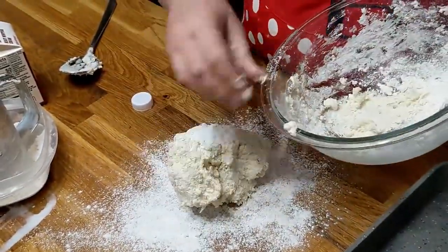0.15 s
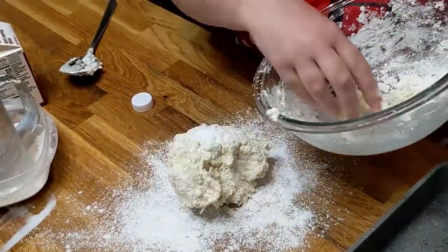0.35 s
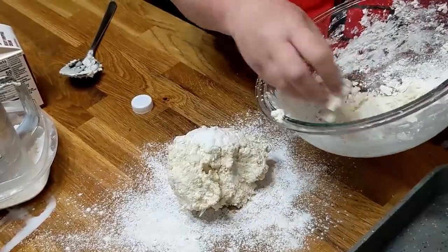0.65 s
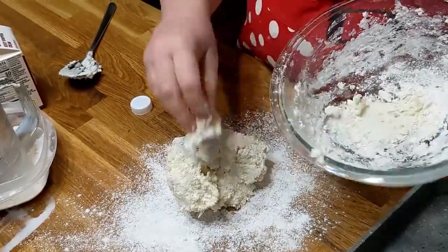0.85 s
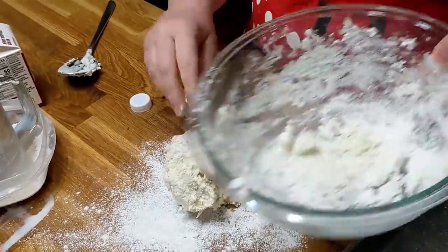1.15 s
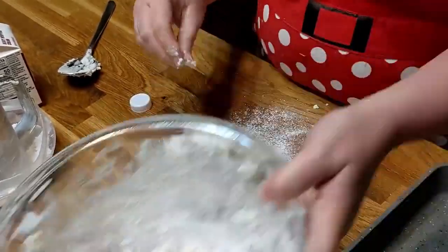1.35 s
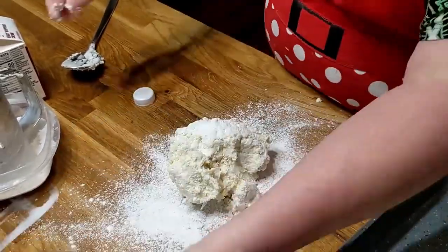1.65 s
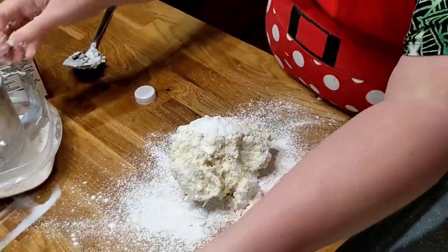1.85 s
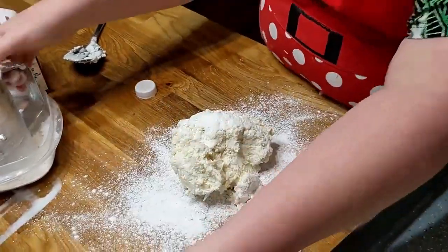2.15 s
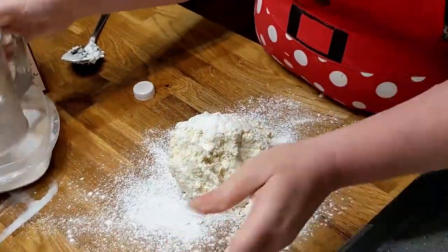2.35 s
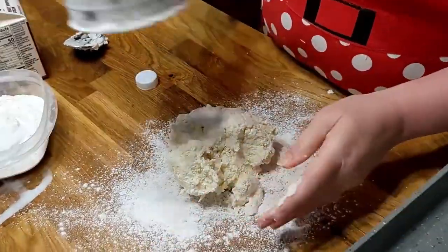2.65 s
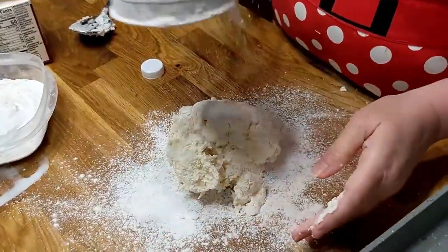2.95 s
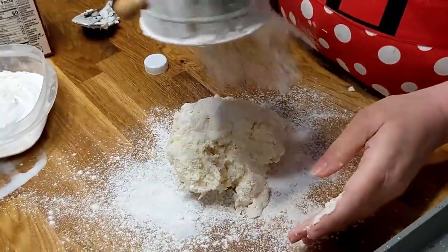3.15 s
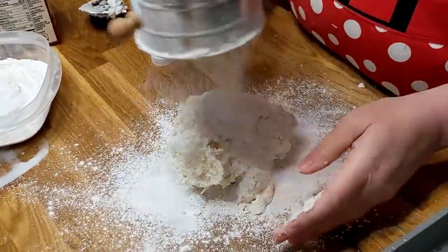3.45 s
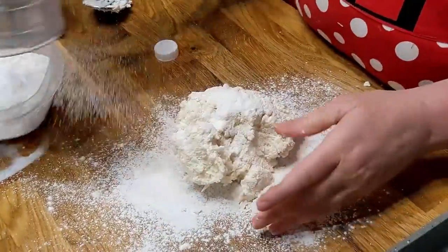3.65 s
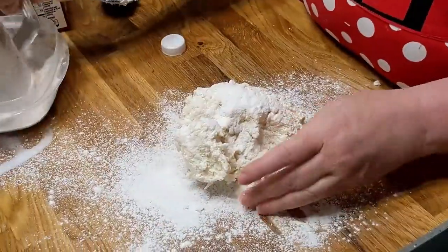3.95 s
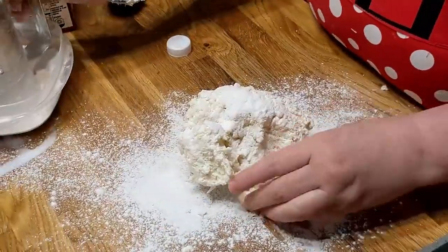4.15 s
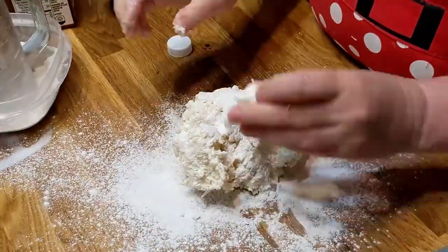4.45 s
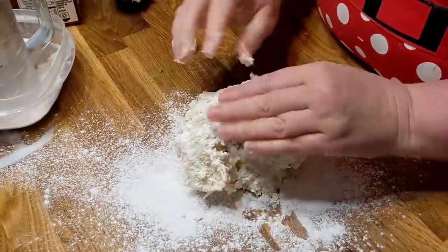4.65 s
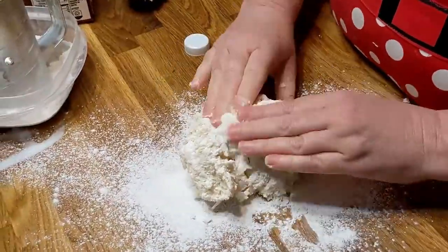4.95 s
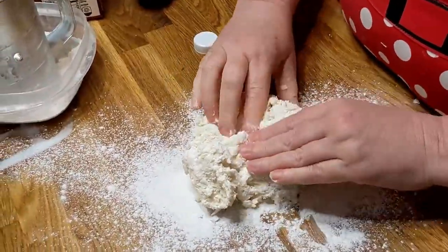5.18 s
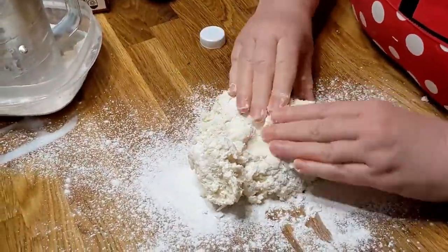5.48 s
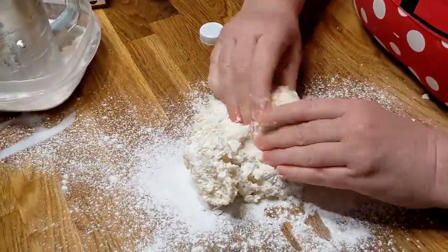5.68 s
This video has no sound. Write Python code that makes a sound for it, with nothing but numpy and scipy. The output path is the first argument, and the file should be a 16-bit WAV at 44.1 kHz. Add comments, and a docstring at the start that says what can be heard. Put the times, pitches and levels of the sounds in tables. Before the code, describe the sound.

A small, lively kitchen heard up close in stereo. From 0 to 1.8 s there is almost nothing: faint low rumble, a weak steady appliance hum, thin hiss and slight sleeve rustle, slowly growing. At about 1.88, 2.03 and 2.13 s a heavy glass bowl hits the wooden worktop: three huge, woody, booming knocks with a glassy click at the edge, squeezed and clipped, their low ring fading over half a second. From 2.75 to 4.0 s a metal sieve is shaken in some sixteen uneven jolts, strongest near 2.85, each a short bright rattle with gritty mesh, hissing powder and slight tinny ring. At 4.18-4.24 s it clatters into a hollow plastic tub, a quick cluster of cracks and clacks with a low thud. A soft dry hand sweep over flour fades from 4.4 s; near 5.6-5.8 s come very faint dull pats and a duller rub on dough.

```python
"""Three booming knocks as a heavy glass bowl is put down to one side on a wooden kitchen counter; then a metal
sieve is shaken, clatters into its plastic flour tub, and hands pat and rub dough over a faint appliance hum.
Solid bodies are sums of damped modes; scrapes, powder, cracks and rustle are shaped noise broken into grains.
A small live room adds a ceiling echo and a diffuse tail; gain control and clipping squeeze the knocks."""
import sys
import numpy as np
from scipy import signal
from scipy.fft import rfft, irfft, next_fast_len
from scipy.io import wavfile
from scipy.ndimage import map_coordinates

SR = 44100
rng = np.random.default_rng(int(sys.argv[2]) if len(sys.argv) > 2 else 0)


def put_to_file(sound):
    """Save the sound as 16-bit audio at rate SR, in the file named by the first command-line argument."""
    columns = np.atleast_2d(sound).T  # one column per channel
    safe = np.clip(columns, -1, 1)
    whole_steps = np.round(safe * 32767)
    wavfile.write(sys.argv[1], SR, whole_steps.astype(np.int16))


N = 256662  # length in samples

# Relative spectrum of skin, flour and cloth rubbing: frequency_hz, density_db (per Hz)
RUSTLE = [(300, -14.5), (900, 0.5), (1600, -0.5), (2800, -2.5), (4500, -11), (7000, -19.5), (15000, -21.5)]


def bowl():
    """Impact excitation: each contact clicks the glass, rings bowl and worktop, and drives the room's boom."""
    # Bowl touching and meeting the worktop: start_s, knock_db, boom_db, click_db
    knocks = [(1.873, -37.5, -48, -68), (1.8818, 1, -5.5, -11), (2.0342, 1, -12, -17),
              (2.1304, 1.5, -6.5, -15.5)]
    # Short modes of bowl and worktop together: frequency_hz, level_db, t60_s
    contact_modes = [(382, -4, 0.057), (463, 10, 0.015), (584, -1.5, 0.018), (749, -12.5, 0.059),
                     (927, -1, 0.034), (1335, -8.5, 0.039), (1753, -17, 0.048), (2518, -29, 0.027),
                     (3900, -22, 0.0071)]
    # Long modes of the worktop: frequency_hz, level_db, t60_s
    worktop_modes = [(109, -3, 0.65), (140.3, -3.5, .52), (179.2, 4, 0.55), (247.34, -4, 0.94),
                     (341, -1.5, 0.44), (384.7, 2, 0.54), (418, -1.5, 0.31), (556, -3, 0.4),
                     (634, -9.5, .4), (694, -8.5, 0.37), (763, -4.5, 0.39), (787, -14.5, 0.67),
                     (880, -14, 0.44), (1001, -8, 0.33), (1303, -9, 0.15), (1420, -12, 0.14),
                     (1715, -18.5, 0.46)]
    # Relative spectrum of the room's boom: frequency_hz, density_db (per Hz)
    boom_spectrum = [(35, -45), (70, -21), (100, -16), (175, -3.5), (280, -9.5), (350, -6.5), (470, -11.5),
                     (630, -6), (900, -15), (1110, -18.5), (1340, -19.5), (1600, -22), (2200, -26.5),
                     (3100, -34.5), (3700, -42.5), (5000, -53.5), (8000, -57.5), (14000, -79.5)]
    # Relative spectrum of the glass click: frequency_hz, density_db (per Hz)
    rim_spectrum = [(30, -6.5), (150, -5), (700, 9), (2000, 5), (4000, -4.5), (6000, -16), (10000, -22),
                    (16000, -32)]
    worktop_db = -17.5  # relative to the knock

    out = np.zeros((2, N))
    for start_s, knock_db, boom_db, click_db in knocks:
        knock = amp(knock_db) * swell(contact_modes, rise_s=0.0016, scatter_db=1)
        worktop = amp(knock_db + worktop_db) * swell(worktop_modes, rise_s=0.006, scatter_db=1.5)
        click = amp(click_db) * burst(colour(rim_spectrum), t60=0.03, attack_s=0.00054)
        boom = amp(boom_db) * tail(colour(boom_spectrum), attack_s=0.0074)
        add(out, start_s, room(knock, wet_db=-23, ceiling_db=-7.5))
        add(out, start_s, click)
        add(out, start_s, worktop)
        add(out, start_s, boom)
    return out


def sieve():
    """Friction and resonance: each shake rattles and rings the metal drum and throws powder on its mesh."""
    # Jolts of the sieve against the hand: jolt_s, strength_db, powder_db, slide_before_s, jolt_t60_s
    shakes = [(2.748, -41.5, -12, 0.00018, .028), (2.801, -20, -8.5, .004, .028),
              (2.853, -14.5, -9, .007, 0.029), (2.952, -18, -15, .009, 0.031),
              (3.103, -26.5, -27, .028, .025), (3.186, -23, -26, .011, .04),
              (3.261, -18, -11.5, 0.0017, .038), (3.387, -25.5, -19.5, .004, 0.042),
              (3.478, -25.5, -32.5, .006, 0.053), (3.57, -25.5, -14, .004, 0.024),
              (3.634, -23.5, -21.5, 0.00096, 0.034), (3.673, -32, -15, .012, .05),
              (3.828, -24.5, -14.5, 0.0013, .028), (3.872, -40.5, -24, 0.0019, 0.066),
              (3.922, -33, -19, 0, .045), (4.001, -37.5, -24, 0.0042, 0.019)]
    # Broad resonances of the drum's body: frequency_hz, width_hz, level_db
    body_peaks = [(890, 170, 1), (1300, 280, -12), (1890, 410, -1.5), (3063, 210, 4), (3670, 180, -2),
                  (4470, 310, -1), (4840, 210, -1.5), (5820, 120, -11.5)]
    # Relative spectrum of the wire mesh scraping: frequency_hz, density_db (per Hz)
    mesh_spectrum = [(450, -26), (800, -5), (1500, -1), (2100, -2), (3050, -9), (3800, -7), (4700, -9.5),
                     (6200, -13.5), (7800, -16.5), (9100, -18), (15000, -19)]
    # Relative spectrum of powder on the mesh: frequency_hz, density_db (per Hz)
    powder_spectrum = [(4000, -36.5), (6500, 5), (8000, -3.5), (9000, 6.5), (12000, -2), (15500, -8)]
    # Lasting ring of the drum: frequency_hz, level_db, t60_s
    drum_modes = [(929, -6, 0.12), (1910, -4, 0.21), (2027, -4, 0.167), (2140, 6.5, 0.11),
                  (2900, -10, 0.04), (3160, -21, 0.15), (3760, -10, 0.18), (4360, -3.5, 0.14),
                  (4680, -17, 0.19), (4900, -7, 0.18)]
    usual_shake_db, usual_ring_db = -24, -51
    ring_growth = 0.66  # dB of ring per dB of strength

    out, n = np.zeros((2, N)), SR // 2
    for jolt_s, strength_db, powder_db, slide_s, t60 in shakes:
        body = amp(-5) * noise(resonances(body_peaks, scatter_db=3.5), n)
        mesh = amp(-8.5) * noise(colour(mesh_spectrum), n)
        powder = amp(powder_db) * noise(colour(powder_spectrum), n)
        contacts = grainy(body + mesh + powder, depth_db=3, rate_hz=900)
        shake = amp(strength_db) * contacts * shake_force(slide_s, t60, n)
        ring_db = usual_ring_db + ring_growth * (strength_db - usual_shake_db)
        metal = amp(ring_db) * ring(drum_modes, attack_s=0.0014, scatter_db=4, size=n)
        add(shake, slide_s, metal)
        add(out, jolt_s - slide_s, room(shake, wet_db=-6.5, ceiling_db=-12.5))
    return low_cut(out, hz=640)


def shake_force(slide_s, t60, n):
    """Stages of contact force: a light slide, the jolt that ends it, then a loose rattle as it settles."""
    slide_db, slide_rise_s = -14, 0.001
    jolt_rise_s = 0.0015
    settle_delay_s, settle_db, settle_t60_s = 0.013, -16, 0.068
    t = np.arange(n) / SR

    def delayed(delay_s, shape):
        return np.interp(t - delay_s, t, shape, left=0)

    release = np.clip((slide_s - t) / jolt_rise_s + 1, 0, 1)  # the slide gives way as the jolt rises
    slide = amp(slide_db) * (1 - np.exp(-t / slide_rise_s)) * release
    jolt = delayed(slide_s, fade(t60, jolt_rise_s, n))
    settle = delayed(slide_s + settle_delay_s, fade(settle_t60_s, jolt_rise_s, n))
    return slide + jolt + amp(settle_db) * settle


def tub():
    """Impact on a hollow shell: the sieve clatters into the plastic tub, which thuds on the counter."""
    # Contacts of the landing: start_s, crack_db, clack_db, thud_db, thud_hz, t60_s (of crack and clack)
    landings = [(4.1836, -16.5, -25, -17, 179.4, 0.035), (4.2045, -21.5, -31, -18.5, 113, 0.08),
                (4.2271, -11.5, -13.5, -24.5, 147.2, 0.026), (4.238, -26.5, -22, -18.5, 145.6, .07)]
    # Modes of the thudding tub: ratio (to thud_hz), level_db, t60_s
    thud_modes = [(.7, -7.5, 0.235), (1, 0.5, 0.17), (1.3, -3.5, .12)]
    # Relative spectrum of metal on plastic: frequency_hz, density_db (per Hz)
    crack_spectrum = [(800, 4), (2300, 3.5), (3400, 1), (4300, -1.5), (5200, -3), (6200, -11.5),
                      (7200, -7.5), (8300, -17), (10000, -12.5), (15500, -25.5)]
    # Relative spectrum of the hollow plastic: frequency_hz, density_db (per Hz)
    clack_spectrum = [(150, -16), (380, -18), (520, -4.5), (720, 14), (950, 2), (1220, 1), (1600, -14),
                      (3000, -17), (6000, -33)]
    rise_s = 0.0016

    out = np.zeros((2, N))
    for start_s, crack_db, clack_db, thud_db, thud_hz, clatter_t60 in landings:
        crack = amp(crack_db) * burst(colour(crack_spectrum), clatter_t60, rise_s)
        clack = amp(clack_db) * burst(colour(clack_spectrum), clatter_t60, rise_s)
        clatter = grainy(crack + clack, depth_db=2.5, rate_hz=1200)
        modes = [(ratio * thud_hz, db, t60) for ratio, db, t60 in thud_modes]
        thud = amp(thud_db) * swell(modes, rise_s=0.003, scatter_db=1)
        add(out, start_s, room(clatter, wet_db=-5.5, ceiling_db=-11))
        add(out, start_s, room(thud, wet_db=-13, ceiling_db=-9))
    return low_cut(out, hz=82.3)


def pats():
    """Heavily damped modes: soft palms push the dough, which answers with low, dead thuds."""
    # Palms on dough: start_s, level_db
    palms = [(5.581, -47), (5.677, -47), (5.689, -44), (5.7, -49)]
    # Modes of the dough: frequency_hz, level_db, t60_s
    dough_modes = [(61.7, -5.5, 0.12), (103.3, 7.5, 0.088), (190, -14, 0.035)]
    out = np.zeros((2, N))
    for start_s, level_db in palms:
        add(out, start_s, amp(level_db) * ring(dough_modes, attack_s=0.0026, scatter_db=1.5))
    return out


def rubs():
    """Friction noise: each stroke swells and dies; pressing on dough is duller than brushing flour."""
    # Arms and hands moving: faint brushes of an arm, then hands sweeping over flour and dough:
    # peak_s, level_db, rise_s, t60_s, tilt_db_per_octave
    strokes = [(1.72, -66.5, .5, 2, 2.5), (2.3, -63.5, .1, 2, 3.5), (2.75, -65.5, .1, 1.2, 2),
               (4.38, -54, 0.086, 1.9, 1.5), (5.78, -52, 0.031, 0.69, -1.5)]
    pivot_hz = 2000  # the tilt leaves this frequency unchanged
    lowest_hz = RUSTLE[0][0]  # the tilt stops growing below this

    out = np.zeros((2, N))
    t = np.arange(-SR, SR) / SR  # seconds from the peak
    for peak_s, level_db, rise_s, t60, tilt in strokes:
        def tilted(hz):
            octaves = np.log2(np.maximum(hz, lowest_hz) / pivot_hz)
            return amp(along(RUSTLE, hz) + tilt * octaves)

        rise = np.exp(-(np.minimum(t, 0) / rise_s) ** 2)
        decay = amp(-60 * np.maximum(t, 0) / t60)
        friction = grainy(noise(tilted, len(t)), depth_db=2, rate_hz=150)
        add(out, peak_s + t[0], amp(level_db) * rise * decay * friction)
    return out


def background():
    """Background sources: room rumble, hiss and sleeve rustle, with the background level rising over the first
    seconds, and a steady appliance hum."""
    # Level of the rumble: time_s, level_db
    room_level = [(0, -63), (1.4, -59.5), (2.7, -55.5), (5.82, -54.5)]
    # Relative spectrum of the rumble: frequency_hz, density_db (per Hz)
    rumble_spectrum = [(12, -40.5), (20, -2), (113, -1.5), (157, -3.5), (238, -6.5), (290, -14.5),
                       (323, -5), (431, -15), (472, -11), (608, -13), (1500, -27.5), (1950, -56),
                       (3300, -120)]
    # Relative spectrum of the hiss: frequency_hz, density_db (per Hz)
    hiss_spectrum = [(1500, -5.5), (4500, -3), (5800, -10.5), (7000, -3.5), (8500, -10), (10000, -3.5),
                     (12000, 3), (14000, -7), (16000, -9.5)]
    # Tones of the appliance: frequency_hz, peak_db
    hum_tones = [(107.7, -73.5), (242.2, -74), (323.0, -67.5), (360.7, -70)]
    # Level at the mean rumble level in dB, and the share of the rumble's drift that it follows
    rustle_db, rustle_follows = -69, 0.65
    hiss_db, hiss_follows = -70, 0.35

    t = np.arange(N) / SR
    room_db = np.interp(t, *np.transpose(room_level))
    drift_db = room_db - room_db.mean()

    def wobble(rate_hz):
        knots = rng.standard_normal(int(N * rate_hz / SR) + 4)
        return map_coordinates(knots, [t * rate_hz])

    rumble = amp(room_db) * noise(colour(rumble_spectrum), N)
    rustle_level = amp(rustle_db + rustle_follows * drift_db + 1.2 * wobble(51))
    rustle = rustle_level * grainy(noise(colour(RUSTLE), N), depth_db=0.5, rate_hz=180)
    hum = np.zeros(N)
    for hz, peak_db in hum_tones:
        hum += amp(peak_db) * np.sin(2 * np.pi * hz * t + 0.6 * wobble(3.5))  # phase wanders, in radians
    hiss = amp(hiss_db + hiss_follows * drift_db) * noise(colour(hiss_spectrum), N)
    return rumble + rustle + hum + hiss


def ring(modes, attack_s, scatter_db, size=SR):
    """Modal synthesis: damped sines, with levels a little different at every blow."""
    port_lag_s = 0.00013  # the waves reach the left microphone port first
    t = np.arange(size) / SR - np.array([[0], [port_lag_s]])
    out = np.zeros((2, size))
    for hz, db, t60 in modes:
        level = amp(db + scatter_db * rng.normal())
        out += level * np.sin(2 * np.pi * hz * t) * fade(t60, attack_s, size)
    return out


def swell(modes, rise_s, scatter_db):
    """Inertia of a heavy panel: its modes build up softly, with no sharp edge."""
    rise = 1 - np.exp(-(np.arange(SR) / SR / rise_s) ** 2)
    return ring(modes, attack_s=0.00061, scatter_db=scatter_db) * rise


def resonances(peaks, scatter_db):
    """Superposed resonances: the gain of (Hz, width Hz, dB) peaks, excited differently at every blow."""
    gains = [amp(db + scatter_db * rng.normal()) for _, _, db in peaks]

    def response(f):
        total = 0
        for k, (centre, width, _) in enumerate(peaks):
            damping = 1j * f * width
            total = total + (-1) ** k * gains[k] * damping / (centre ** 2 - f ** 2 + damping)  # signs alternate
        return abs(total)

    return response


def grainy(x, depth_db, rate_hz):
    """Random amplitude modulation: tiny separate contacts break a hiss up into grains."""
    n = x.shape[-1]
    knots = rng.standard_normal(int(n * rate_hz / SR) + 4)
    level_db = depth_db * map_coordinates(knots, [np.arange(n) * rate_hz / SR], order=1)
    return x * unit(amp(level_db))


def burst(gain, t60, attack_s):
    """Transient noise: a short dying puff with the given spectrum."""
    return noise(gain, SR // 2) * fade(t60, attack_s, SR // 2)


def fade(t60, attack_s, n):
    """Exponential damping: a quick rise, then a fall of 60 dB in every t60 seconds."""
    t = np.arange(n) / SR
    return np.exp(-np.log(1000) * t / max(t60, 1e-3)) * (1 - np.exp(-t / attack_s))


def low_cut(x, hz):
    """Low cut: a gentle high-pass thins away the lowest frequencies below the given frequency."""
    return signal.sosfilt(signal.butter(2, hz, "highpass", fs=SR, output="sos"), x)


def room(x, wet_db, ceiling_db, ceiling_s=0.0145):
    """Room impulse response: the direct sound, a slap from the ceiling and a fresh diffuse tail."""
    diffuse = tail(np.ones_like, attack_s=0.002)
    response = amp(wet_db) * diffuse / np.linalg.norm(diffuse[0])
    response[:, 0] += 1
    response[:, round(ceiling_s * SR)] += amp(ceiling_db)
    return signal.fftconvolve(x, response, axes=1)


def tail(gain, attack_s):
    """Reverberant decay: diffuse sound in which each frequency dies at its own speed."""
    # Reverberation of the kitchen: frequency_hz, t60_s
    kitchen = [(80, 0.45), (250, 0.59), (600, 0.43), (1500, 0.48), (3000, .46), (6000, 0.37), (14000, 0.48)]
    hz, t, bins = signal.stft(noise(gain, SR), SR, nperseg=512)
    decay = np.exp(-np.log(1000) * t / along(kitchen, hz)[:, None])
    dying = signal.istft(bins * decay, SR, nperseg=512)[1][:, :SR]
    return dying * (1 - np.exp(-np.arange(SR) / SR / attack_s))


def noise(gain, n):
    """Interaural coherence: stereo noise of rms 1, alike in the bass and unrelated in the treble."""
    # Likeness of left and right: frequency_hz, correlation
    likeness = [(30, 0.78), (70, 0.64), (280, 0.95), (640, 0.39), (1400, 0), (3000, 0)]

    def mid_side_gain(hz):
        angle = np.arccos(np.clip(along(likeness, hz), -1, 1)) / 2
        return gain(hz) * np.array([np.cos(angle), np.sin(angle)])

    mid, side = filtered(rng.standard_normal((2, n)), mid_side_gain)
    return unit(np.array([mid + side, mid - side]))


def colour(spectrum):
    """Spectral shaping: the gain of a (Hz, dB) spectrum as a function of frequency."""
    return lambda hz: amp(along(spectrum, hz))


def along(points, hz):
    """Logarithmic pitch: (Hz, value) points interpolated on a log frequency axis."""
    f, v = np.transpose(points)
    return np.interp(np.log(hz + 1), np.log(f + 1), v)


def filtered(x, response):
    """Linear filtering: the spectrum of x times a response of frequency."""
    n = x.shape[-1]
    m = next_fast_len(n + 8192)  # zero padding limits wrap-around
    return irfft(rfft(x, m) * response(np.fft.rfftfreq(m, 1 / SR)), m)[..., :n]


def amp(db):
    """Level law: decibels to amplitude gain."""
    return 10 ** (np.asarray(db) / 20)


def unit(x):
    """Normalisation: scale to rms 1."""
    return x / np.sqrt(np.mean(x ** 2) + 1e-20)


def add(track, start_s, x):
    """Superposition: mix x into the track at start_s, cut at the track's end."""
    part = track[:, round(start_s * SR):][:, :x.shape[1]]
    part += x[:, :part.shape[1]]


def scene():
    """Level panning: the utensils sit off centre, so their middle range leans to the right."""
    # Stereo balance of the utensils: frequency_hz, left_minus_right_db
    balance = [(400, 1.3), (700, 1.3), (1300, -3.2), (2400, -4.2), (4400, -1.5), (8000, .5), (15000, 2.5)]

    def lean(hz):
        return amp(along(balance, hz) * np.array([[1], [-1]]) / 2)

    utensils = filtered(bowl() + sieve() + tub(), lean)
    return utensils + pats() + rubs() + background()


def compress(x, threshold_db, slope, reaction_s, late_s):
    """Gain control: loud sound is turned down a moment late, so attacks punch through, and let go as it dies."""
    keep = np.exp(-1 / (reaction_s * SR))
    power = signal.lfilter([1 - keep], [1, -keep], np.mean(x ** 2, axis=0))
    over_db = np.maximum(10 * np.log10(power + 1e-12) - threshold_db, 0)
    late_over_db = np.pad(over_db, (round(late_s * SR), 0))[:N]
    return x * amp(-slope * late_over_db)


def record(dry):
    """Limited dynamics and bandwidth: gain control, clipping at full scale and a sharp treble limit."""
    top_hz = 16250
    levelled = compress(dry, threshold_db=-21, slope=0.4, reaction_s=0.055, late_s=0.005)
    return filtered(np.clip(levelled, -1, 1), lambda hz: hz < top_hz)


dry = scene()
out = record(dry)
put_to_file(out)
```